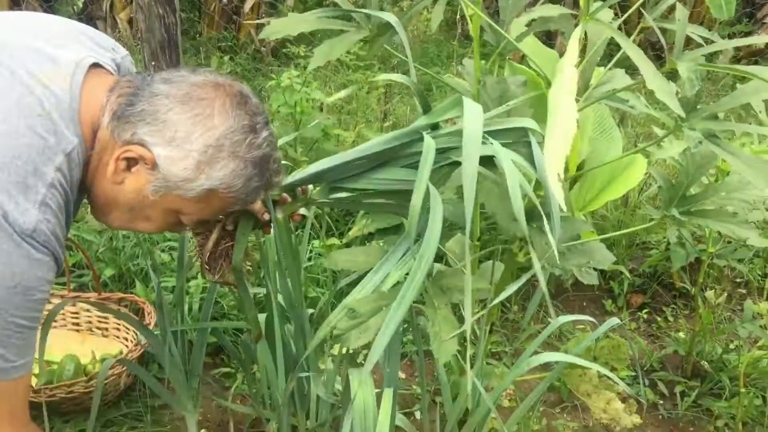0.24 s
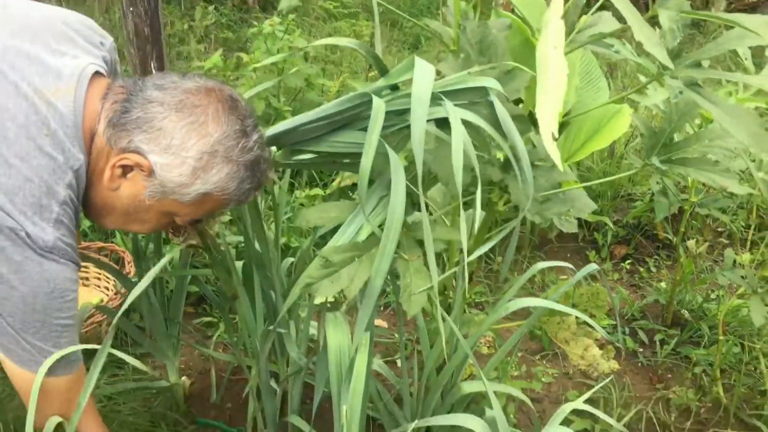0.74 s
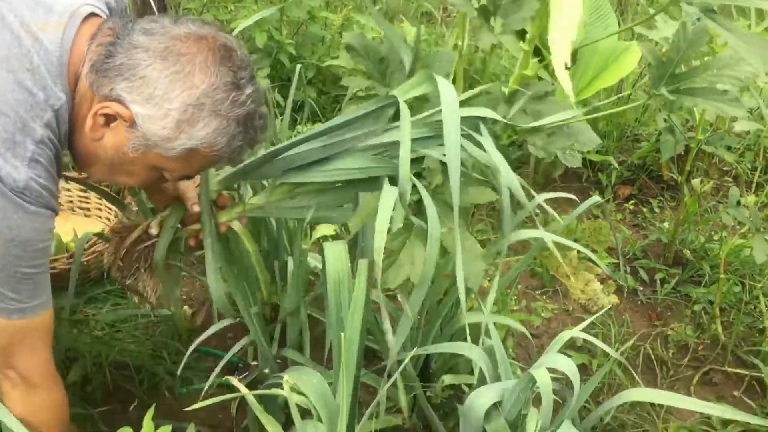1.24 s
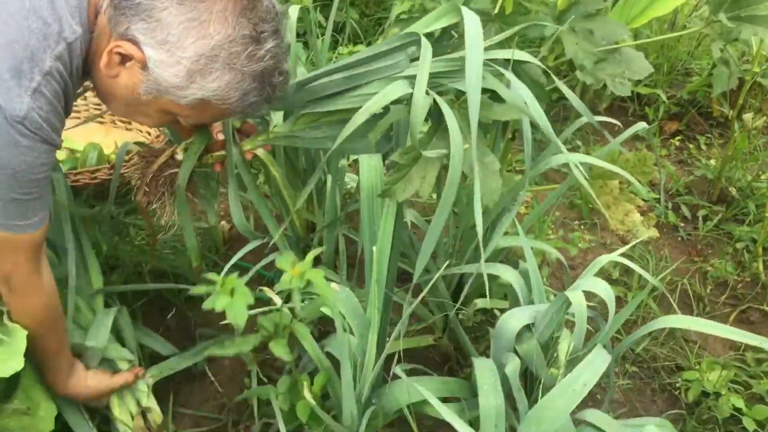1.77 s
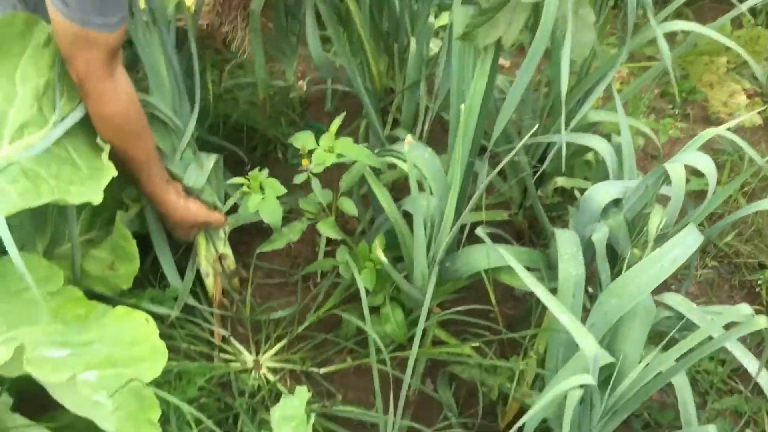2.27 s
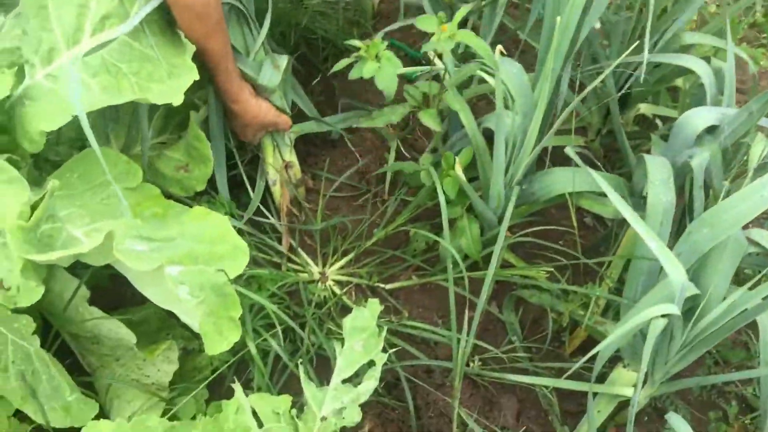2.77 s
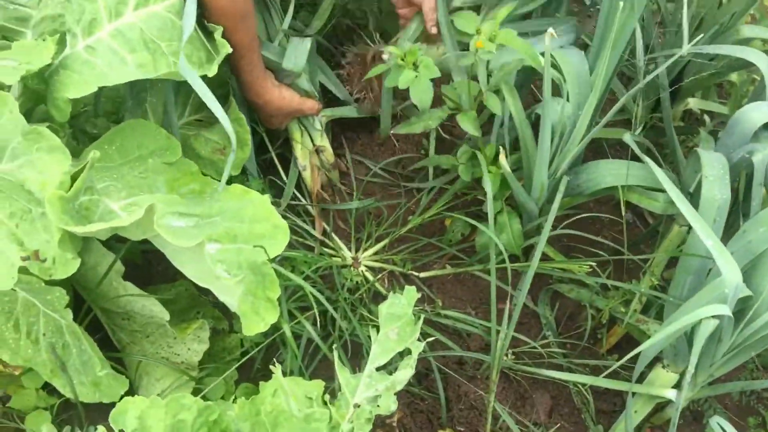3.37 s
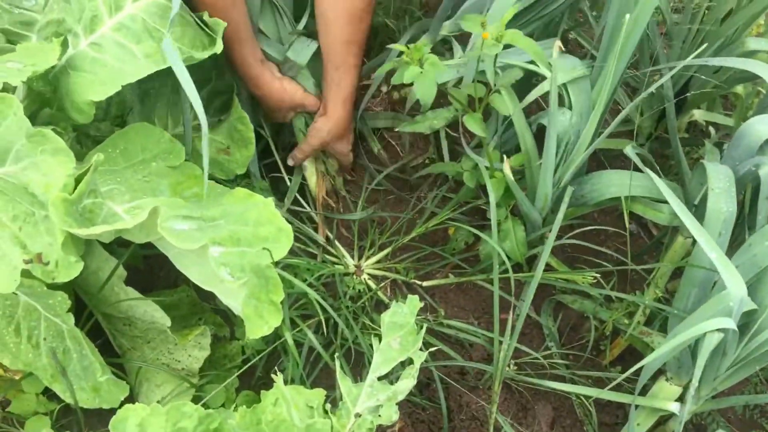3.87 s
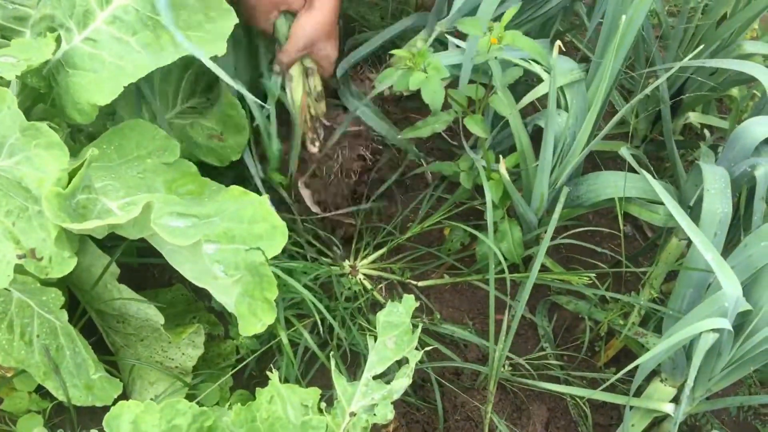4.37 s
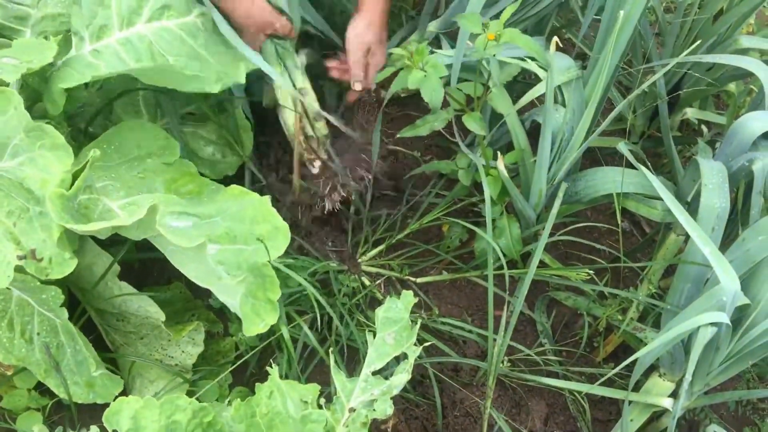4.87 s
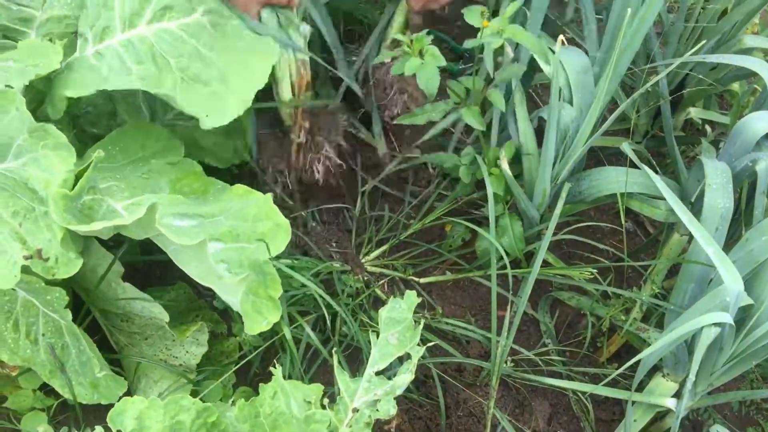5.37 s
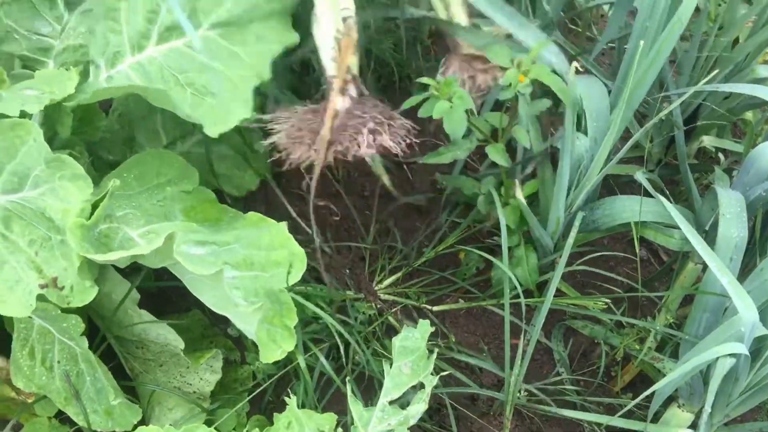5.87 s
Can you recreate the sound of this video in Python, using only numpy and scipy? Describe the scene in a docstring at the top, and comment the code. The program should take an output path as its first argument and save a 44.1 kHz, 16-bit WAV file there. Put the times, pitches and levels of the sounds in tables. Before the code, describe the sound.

A close, almost dry garden sound over very quiet air with a distant low rumble. From 0 to 0.3 s leaves brush softly with dull, low knocks; a near lull follows, with a tiny bright squeak at 0.65 s. From 0.9 to 1.4 s the leaves rustle in several strokes with fibre snaps. Around 1.8 s rubbing resumes, a sharp crack comes at 2.2 s, and from 2.3 to 2.8 s the stalk ticks and creaks in uneven slips. Softer leaf strokes continue to 3.6 s, then another creaking pull. From 4.1 to 4.5 s roots part in rapid pops, strongest near 4.3 s, with a faint low hum underneath. Afterwards soil crumbles and trickles steadily, with short gritty shakes and knocks around 4.8, 5.2, 5.5 and 6 s. Faint birds whistle throughout, clearest as a high falling chirp at 4.4 s.

```python
"""Leeks are pulled by hand, close by, in a vegetable garden: clumps of tiny random contacts make leaves rub
and soil crumble, and the stalk creaks by sticking and slipping. Noise bursts snap, damped rings pop and knock;
from 4.1 s the roots part with small pops, and soil falls off the lifted root ball.
Birds whistle in gliding tones behind, with a short squeak, a faint low tone and a rumble in the air."""
import sys
import numpy as np
from scipy import signal
from scipy.fft import rfft, irfft
from scipy.io import wavfile

SR = 44100
rng = np.random.default_rng(int(sys.argv[2]) if len(sys.argv) > 2 else 0)


def to_wav(sig):
    """Store sig (one row per channel, or 1-D mono) as 16-bit WAV at the path in sys.argv[1].

    Samples outside -1..1 are clipped; the rate is SR.
    """
    pcm = np.clip(np.atleast_2d(sig), -1, 1) * 32767
    pcm = np.round(pcm).astype(np.int16)
    wavfile.write(sys.argv[1], SR, pcm.T)  # frames by channels


N = 270392
T = np.arange(N) / SR


def amp(db):
    """Turn decibels into a gain."""
    return 10 ** (np.asarray(db) / 20)


def rms_one(x):
    """Scale to rms 1."""
    return x / np.sqrt(np.mean(x ** 2) + 1e-20)


def at_hz(points, hz):
    """Read a spectrum between its points, on a log frequency axis."""
    point_hz, point_db = np.array(points).T
    return np.interp(np.log(hz), np.log(point_hz), point_db)


def band(x, low_hz, high_hz):
    """Keep only the pitches between two limits."""
    limits = [low_hz, min(high_hz, SR / 2 - 1000)]
    return signal.sosfilt(signal.butter(2, limits, "band", fs=SR, output="sos"), x)


def drift(per_s, size=N):
    """Wander smoothly at random, with a new target per_s times a second and a spread near 1."""
    knots = rng.standard_normal(2048)
    return np.interp(T[:size] * per_s, np.arange(len(knots)), knots)


def add(out, s, sound):
    """Mix a short sound in at a time in seconds."""
    i = max(round(s * SR), 0)
    out[i:i + len(sound)] += sound[:max(N - i, 0)]


def scatter(x, t60, wet_db):
    """Ground and plants all around return a thin spray of echoes, dying by 60 dB in t60 seconds."""
    t = T[:SR // 2]
    sparse = rng.standard_normal(len(t)) * (rng.random(len(t)) < .05)
    echoes = sparse * amp(-60 * t / t60) * (t > .002)
    return x + amp(wet_db) * signal.fftconvolve(x, echoes / np.linalg.norm(echoes))[:N]


def damped_ring(hz, rise_s=0.00063):
    """One push rings a wet, heavily damped body that swells and soon dies."""
    t = T[:SR // 40]
    swell = (t / rise_s * np.exp(1 - t / rise_s)) ** 2
    return swell * np.sin(2 * np.pi * (hz * t + rng.random()))


def gestures(rows, attack_s, release_s, arch_db):
    """Power of movements: each sets in, arches (or sags, if negative) in the middle and dies away."""
    out = np.zeros(N)
    for s, length, level_db in rows:
        t = T[:int(length * SR) + SR // 4]
        arch = amp(level_db + arch_db * (np.sin(np.pi * np.minimum(t / length, 1)) - .5))
        attack = np.minimum(t / attack_s, 1)
        release = np.exp(-np.maximum(t - length, 0) / release_s)
        add(out, s, (arch * attack * release) ** 2)
    return out


def grains(low_hz, high_hz, colour, per_s, spread_db, clump_db, smooth, patchy_db, count):
    """Tiny contacts come in clumps; each excites a row of narrow bands with changing strengths. Rms 1."""
    born = rng.random(N) < per_s / SR
    sizes = born * amp(spread_db * np.minimum(rng.exponential(1, N), 3))
    clumps = amp(clump_db * drift(130))
    # a steady part fills the gaps between the contacts
    push = clumps * np.sqrt(rms_one(sizes) ** 2 + smooth ** 2)
    contacts = push * rng.standard_normal((3, N))
    edges = np.geomspace(low_hz, high_hz, count + 1)
    out = 0
    for k, (low, high) in enumerate(zip(edges, edges[1:])):
        # the flexing plant favours now one band, now another
        gain = amp(colour(np.sqrt(low * high)) + patchy_db * drift(35))
        out = out + gain * band(contacts[k % len(contacts)], low, high)
    return rms_one(out)


# colour of the outdoor air: (frequency [Hz], level [dB per Hz, relative])
AIR_SPECTRUM = [(25, -38), (40, 0), (62, 8), (110, 1.5), (170, -9), (330, -5), (500, -17), (800, -11.5),
                (1250, -13), (2000, -7.5), (5500, -15), (8000, -28), (11000, -25), (15800, -35)]


def garden(level_db=-64.5):
    """Even outdoor air with a distant rumble: noise shaped by a spectrum."""
    white = rfft(rng.standard_normal(N))
    hz = np.maximum(np.arange(len(white)) * SR / N, 1)
    return amp(level_db) * rms_one(irfft(white * amp(at_hz(AIR_SPECTRUM, hz)), N))


def drone(s=4.24, length=0.31, hz=208, level_db=-55.0):
    """A faint low tone with a wavering pitch comes and goes, perhaps an insect on the wing."""
    swell = np.sqrt(gestures([(s, length, level_db)], attack_s=0.045, release_s=.02, arch_db=4.0))
    return swell * np.sin(2 * np.pi * np.cumsum(hz * (1 + 0.0074 * drift(15))) / SR)


# bird notes: (start [s], length [s], first pitch [Hz], last pitch [Hz], relative level [dB])
BIRD_NOTES = [(0.252, 0.079, 10270, 8220, -52.5), (0.533, 0.058, 1763, 1626, -56),
              (1.156, 0.069, 1990, 1954, -48), (1.474, 0.048, 1730, 1660, -56),
              (1.748, 0.068, 2590, 2560, -52.5), (1.877, 0.053, 1950, 2117, -46.5),
              (1.906, 0.089, 2340, 2250, -55), (2.27, .1, 1500, 1490, -56), (2.7, 0.076, 9900, 8200, -56),
              (3.167, 0.073, 7500, 6200, -51.5), (3.256, 0.078, 6670, 6400, -58),
              (3.764, 0.045, 6540, 5470, -62), (3.802, .06, 9150, 8550, -65),
              (3.942, 0.033, 3850, 4400, -58), (4.406, 0.024, 7660, 6490, -44),
              (4.438, 0.036, 6430, 6130, -40.5), (4.945, 0.077, 9720, 8470, -53.5),
              (5.577, 0.076, 1880, 2070, -50.5)]


def birds():
    """Thin gliding whistles with a quick flutter, smeared by the foliage."""
    out = np.zeros(N)
    for s, length, first_hz, last_hz, level_db in BIRD_NOTES:
        u = np.arange(0, 1, 1 / (length * SR))   # 0 to 1 through the note
        hz = first_hz + (last_hz - first_hz) * np.sin(np.pi / 2 * u ** 0.76) ** 2
        hz = hz * (1 + 0.00403 * hz / 1000 * drift(602, size=len(u)))   # higher notes waver more
        flutter = rms_one(amp(3.9 * drift(127, size=len(u))))
        swell = np.sin(np.pi * u) ** 0.25
        whistle = np.sin(2 * np.pi * np.cumsum(hz) / SR)
        add(out, s, amp(level_db - 2.0) * flutter * swell * whistle)
    return scatter(out, t60=0.21, wet_db=4.0)


def squeak(s=0.655, pitch_hz=1058, length=0.022, level_db=-53):
    """A short bright squeak: a wavering pitch with a stack of overtones."""
    overtones_db = [-27, -22, -2.0, -5, -7, 3, 1.5, -14, -12, -20, -25]   # from the base pitch up
    u = np.arange(0, 1, 1 / (length * SR))
    turns = np.cumsum(pitch_hz * (1 + 0.011 * drift(360, size=len(u)))) / SR
    tone = 0
    for k, db in enumerate(overtones_db):
        tone = tone + amp(db) * np.sin(2 * np.pi * ((k + 1) * turns + rng.random()))
    out = np.zeros(N)
    add(out, s, amp(level_db) * np.sin(np.pi * np.sqrt(u)) * tone)
    return scatter(out, t60=0.12, wet_db=-5)


# dull knocks of the bundle and of clods on the ground: (time [s], rough peak level [dB], pitch [Hz])
KNOCK_HITS = [(.032, -48.5, 228), (0.073, -48, 238), (.1, -44, 151), (.166, -43.5, 256), (.215, -51.5, 600),
              (.255, -51, 85), (.454, -53, 619), (.775, -52, 340), (.935, -52, 283), (1.056, -50, 705),
              (1.199, -42.5, 233), (1.985, -46, 212), (2.005, -48.5, 534), (4.568, -47, 243),
              (5.17, -42.5, 502), (5.2, -49.5, 130), (5.489, -42.5, 534), (5.492, -45.5, 239.3),
              (5.772, -51.5, 263), (5.998, -44.5, 264), (6.071, -47, 393)]


def knocks(rise_s=0.0058):
    """Soft heavy contacts swell and die within a few cycles."""
    out = np.zeros(N)
    for s, peak_db, hz in KNOCK_HITS:
        add(out, s - .002, amp(peak_db) * damped_ring(hz, rise_s))
    return out


# leaves and fibres snapping:
# (time [s], level before colouring [dB rms over 10 ms], brightness [dB per octave], 60 dB decay [s])
FIBRE_SNAPS = [(0.025, -61, -3, .035), (0.0968, -54, -6.5, 0.039), (0.1651, -57, -4.5, 0.088),
               (0.457, -62, -9, .02), (1.024, -49.5, 4.5, .024), (1.236, -44, -3, 0.075),
               (1.311, -46.5, .8, 0.012), (1.672, -52, -3.5, 0.066), (1.689, -52.5, 1, 0.09),
               (1.8238, -55, -2.5, 0.0073), (2.0397, -40.5, 3.5, 0.008), (2.2202, -33, 1.2, 0.0054),
               (2.2719, -47.5, 4, 0.015), (2.376, -42, 1, .015), (2.451, -54.5, 5, 0.011),
               (3.365, -50.5, 1.2, 0.011), (3.653, -53, 3.5, 0.12), (4.12, -42, -4.5, 0.018),
               (4.154, -50, 2.2, .012), (4.258, -46, -2.3, .013), (4.332, -50.5, 5.5, 0.038),
               (4.3916, -37, 0.9, 0.022), (4.4496, -49, -1.5, 0.044), (4.852, -46.5, -4.5, .03),
               (5.483, -47.5, 0.5, 0.053), (5.8454, -42, -1.1, 0.02), (5.867, -45, -4, 0.011),
               (6.0605, -48.5, 4, .008)]
# colour shared by all snaps: (from [Hz], to [Hz], level [dB])
SNAP_COLOUR = [(192, 1230, -12), (1295, 2700, 0.1), (3230, 5440, -1), (5500, 8400, -6), (7450, 15000, -7)]


def snaps(pivot_hz=2870):
    """A fibre breaks with a sharp crack, then tears on briefly; brightness tilts about the pivot pitch."""
    out, t = np.zeros(N), T[:SR // 10]
    ten_ms = SR * .01   # in samples
    for s, snap_db, tilt_db, t60 in FIBRE_SNAPS:
        # a tear, and the fainter shiver of the leaf after it
        decay = amp(-60 * t / t60) + amp(-30.0) * amp(-60 * t / 0.2)
        tear = decay * (1 - np.exp(-t / 0.00054))
        for low, high, colour_db in SNAP_COLOUR:
            level_db = snap_db + colour_db + tilt_db * np.log2(np.sqrt(low * high) / pivot_hz)
            crack = band(rng.standard_normal(len(t)) * tear, low, high)
            crack = band(crack, low / np.sqrt(2), high * np.sqrt(2))
            add(out, s - .0003, amp(level_db) * crack * np.sqrt(ten_ms / np.sum(crack ** 2)))
    return out


# leaves brushed by the arm or the bundle:
# (start [s], length [s], rubbing level [dB], dull flapping level [dB], fine crackle level [dB])
LEAF_STROKES = [(0.012, 0.083, -54, -51, -58.5), (0.165, .12, -63, -61, -71), (0.57, .08, -75, -74, -74),
                (0.898, .12, -57, -58.5, -63), (1.029, 0.12, -53, -59, -58.5),
                (1.159, .11, -50, -54.5, -56.5), (1.277, 0.11, -49, -54, -55.5),
                (1.496, 0.19, -59, -66, -73), (1.747, 0.28, -59.5, -55, -64.5),
                (1.822, 0.037, -51.5, -79, -52.5), (2.005, 0.27, -49.5, -80, -57.5),
                (2.297, 0.2, -53, -86, -57.5), (2.563, 0.065, -53.5, -85, -55.5),
                (2.817, 0.11, -56.5, -70, -58), (2.929, .16, -52.5, -65, -58.5),
                (3.14, 0.071, -52, -81, -55), (3.358, 0.23, -54, -79, -60), (3.77, 0.53, -59.5, -71.5, -68),
                (4.053, 0.18, -53, -60.5, -60), (5.202, 0.11, -50, -61, -56), (5.66, 0.064, -61, -77, -61)]


def strokes():
    """Power of rubbing, flapping and crackling as leaves are brushed."""
    starts, lengths, *levels_db = np.transpose(LEAF_STROKES)
    return [gestures(zip(starts, lengths, db), attack_s=0.023, release_s=0.046, arch_db=-0.5)
            for db in levels_db]


# the root ball comes free and is shaken, shedding soil: (start [s], length [s], level [dB])
ROOT_SHAKES = [(4.22, 0.31, -54), (4.56, 0.12, -52), (4.76, 0.28, -55.5), (5.13, 0.11, -51),
               (5.23, 0.21, -55), (5.465, 0.047, -48), (5.53, 0.031, -67), (5.645, 0.033, -56),
               (5.84, 0.052, -73), (5.99, .04, -50.5), (6.06, 0.027, -56)]


def shakes():
    """Power of the quick shakes that shed soil."""
    return gestures(ROOT_SHAKES, attack_s=0.0093, release_s=0.017, arch_db=0.8)


# pulls on the stalk: (start [s], length [s], creak level [dB])
STALK_TUGS = [(.2, 0.037, -59), (1.18, 0.12, -55), (1.765, 0.11, -52), (2.075, 0.17, -47), (2.26, .23, -50),
              (2.785, 0.22, -53.5), (3.4, 0.16, -61), (3.65, 0.048, -56), (3.785, 0.28, -52),
              (4.09, 0.22, -49.5), (5.15, 0.31, -50.5)]


def tugs():
    """Power of the creak while the stalk is pulled."""
    return gestures(STALK_TUGS, attack_s=0.019, release_s=0.031, arch_db=-1.5)


def effort():
    """Gains of soil, creak, leaves and crackle: strokes, tugs and shakes each stir several of them."""
    rub, flap, fine = strokes()
    shake = shakes()
    soil = flap + shake
    # decibels here are relative to the rubbing or to the shaken soil
    creak = tugs() + rub * amp(-5) ** 2 + shake * amp(-1.5) ** 2
    leaf = rub + shake * amp(-3.5) ** 2
    crackle = fine + shake * amp(-5.5) ** 2
    # a steady stir among the plants; once the leek is lifted, crumbs trickling off it add to it
    stir_db, trickle_db = (-68, -75, -69.5, -69.5), (-61.5, -53, -56, -56.5)
    lift_s, lift_rise_s = 4.235, 0.016
    lifted = np.clip((T - lift_s) / lift_rise_s, 0, 1)
    return [np.sqrt(power + amp(stir) ** 2 + lifted * amp(trickle) ** 2)
            for power, stir, trickle in zip((soil, creak, leaf, crackle), stir_db, trickle_db)]


# colour of the crumbling soil: (frequency [Hz], level [dB per Hz, relative])
SOIL_SPECTRUM = [(65, 1.5), (105, -2), (165, -2), (240, 2), (370, -1), (480, -3), (640, -2), (880, -5),
                 (1150, -3), (1400, -18)]


def soil_crumbs():
    """Soil crumbles in sparse, coarse, low grains."""
    return grains(60, 1500, lambda hz: at_hz(SOIL_SPECTRUM, hz), per_s=260, spread_db=4.0,
                  clump_db=3.0, smooth=0.64, patchy_db=3.5, count=18)


# colour of the sliding leaves: (frequency [Hz], level [dB per Hz, relative])
LEAF_SPECTRUM = [(900, -2), (1250, -5.5), (1550, 3), (2600, 3.5), (3300, 1.5), (4200, 1.5), (6100, -4),
                 (7600, -5), (9000, -20)]


def leaf_slide():
    """Waxy leaves slide on each other in many small contacts."""
    return grains(900, 9000, lambda hz: at_hz(LEAF_SPECTRUM, hz), per_s=700, spread_db=-2.0,
                  clump_db=1.5, smooth=1.0, patchy_db=4.0, count=22)


# colour of the fine crackle: (frequency [Hz], level [dB per Hz, relative])
CRACKLE_SPECTRUM = [(5000, 0.5), (6300, 4), (7600, -2.5), (8900, -4.5), (10400, -1.5), (12500, -2),
                    (15500, -4)]


def fine_crackle():
    """Leaf surfaces crackle in a dense rain of high contacts."""
    return grains(5000, 16500, lambda hz: at_hz(CRACKLE_SPECTRUM, hz), per_s=1600, spread_db=-0.5,
                  clump_db=1.75, smooth=1.1, patchy_db=2.5, count=14)


# the grip on the stalk:
# (time [s], creak pitch [Hz], share of the creak that breaks into separate slips [0-1])
STALK_GRIP = [(0, 2130, 0), (1.302, 1920, 0.01), (2.1, 2150, 0.3), (2.3, 2180, 0.57), (2.5, 2200, 0.9),
              (2.8, 2070, 0.48), (2.999, 1930, 0), (3.7, 2226, 0.44), (3.85, 1680, 0.09), (4.3, 1780, 0.2),
              (4.7, 1460, 0.04), (5.3, 1580, 0.02), (5.601, 1730, 0.08), (6.1, 1650, 0.08)]


def grip_at(s):
    """Creak pitch and slip share at any time; both glide between the table rows."""
    row_s, row_hz, row_share = np.transpose(STALK_GRIP)
    return np.interp(s, row_s, row_hz), np.interp(s, row_s, row_share)


# the strongest slips of the stalk and the parting roots: (time [s], rough peak level [dB])
ROOT_POPS = [(2.3097, -31), (2.3308, -34), (2.343, -37), (2.359, -31), (2.403, -33), (2.4224, -35),
             (2.4403, -38), (2.468, -43), (2.4826, -43), (2.499, -31), (2.5746, -41.5), (2.6542, -37.5),
             (2.7493, -36.5), (2.7866, -38), (3.7291, -40.5), (4.0971, -30), (4.157, -34), (4.1707, -31),
             (4.1866, -31), (4.2091, -32), (4.2497, -25), (4.3151, -22.5), (4.3202, -27), (4.327, -30),
             (4.5075, -28), (5.6282, -33.5)]


def pops():
    """Strong slips and parting roots ring briefly at the pitch of the grip."""
    out = np.zeros(N)
    for s, peak_db in ROOT_POPS:
        grip_hz, _ = grip_at(s)
        add(out, s, amp(peak_db) * damped_ring(grip_hz))
    return out


def stick_slip(hz, tightness, uneven=.38, spread_db=0.3):
    """Strain builds and lets go at uneven intervals; a tight grip gives fewer, stronger slips. Rms 1."""
    loose_per_s, tight_per_s = 210, 65   # rough slip rates
    per_s = loose_per_s + (tight_per_s - loose_per_s) * tightness
    out, chance = np.zeros(N), rng.standard_normal((2000, 3))
    # a slip happens each time the built-up strain passes the next uneven step
    strain, steps = np.cumsum(per_s) / SR, np.cumsum(np.exp(uneven * chance[:, 0]))
    slips = np.searchsorted(strain, steps)
    for i, (_, strength, detune) in zip(slips[slips < N], chance):
        gain = amp(spread_db * np.tanh(strength)) / np.sqrt(per_s[i])
        add(out, T[i], gain * damped_ring(hz[i] * np.exp(0.12 * detune)))
    return rms_one(out)


# colour of the rubbing creak around its pitch: (frequency / creak pitch [ratio], level [dB])
CREAK_SPECTRUM = [(.45, -52), (.6, -11.5), (.73, 2), (.92, -3), (1.13, 0.5), (1.3, -5.5), (1.5, -6),
                  (1.98, -9.5), (2.3, -11.5)]


def stalk_rub(creak_hz):
    """The stalk rubs evenly in the hand, its colour following the creak pitch."""
    return grains(900, 4800, lambda hz: at_hz(CREAK_SPECTRUM, hz / creak_hz), per_s=600, spread_db=2,
                  clump_db=3.0, smooth=0.72, patchy_db=3.0, count=18)


def handling():
    """Soil crumbles, the stalk sticks and slips, and leaves slide with a fine crackle."""
    soil_gain, creak_gain, leaf_gain, crackle_gain = effort()
    creak_hz, slipping = grip_at(T)
    slipping = np.clip(slipping, 0, 1)
    soil = soil_gain * soil_crumbs()
    rub = stalk_rub(creak_hz)
    leaves = leaf_gain * leaf_slide() + crackle_gain * fine_crackle()
    # a tighter grip turns even rubbing into separate slips
    creak = np.sqrt(1 - slipping) * rub + np.sqrt(slipping) * stick_slip(creak_hz, slipping)
    return soil + creak_gain * creak + leaves


def scene():
    """Near plants sound almost dry; birds and air lie behind them."""
    near = scatter(handling() + snaps() + pops() + knocks(), t60=0.034, wet_db=-10.0)
    behind = birds() + squeak() + drone() + garden()
    return (near + behind)[None]


# colour of the microphone: (frequency [Hz], width [Hz], level [dB])
MICROPHONE_PEAKS = [(60, 13.5, 3.5), (6360, 280, 0), (7680, 1820, -4.5), (8800, 1400, 5.5),
                    (10490, 700, -7)]


def record(dry):
    """A small microphone: thin deep bass, a few peaks and dips, nothing much above 16 kHz."""
    x = signal.sosfilt(signal.butter(2, 38, "high", fs=SR, output="sos"), dry)
    for hz, width_hz, db in MICROPHONE_PEAKS:
        x = x + (amp(db) - 1) * signal.lfilter(*signal.iirpeak(hz, hz / width_hz, fs=SR), x)
    return signal.sosfilt(signal.ellip(10, .2, 80, 16000, fs=SR, output="sos"), x)


dry = scene()
out = record(dry)
to_wav(out)
```